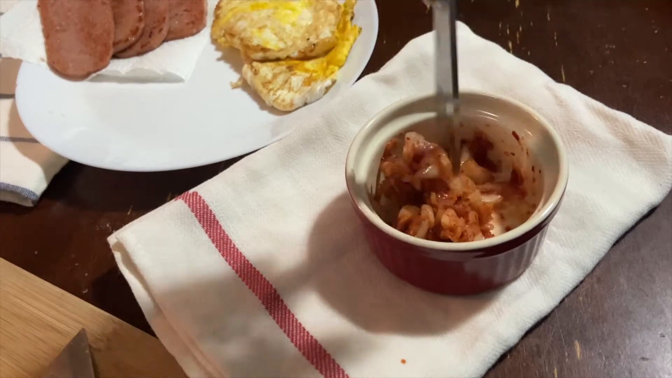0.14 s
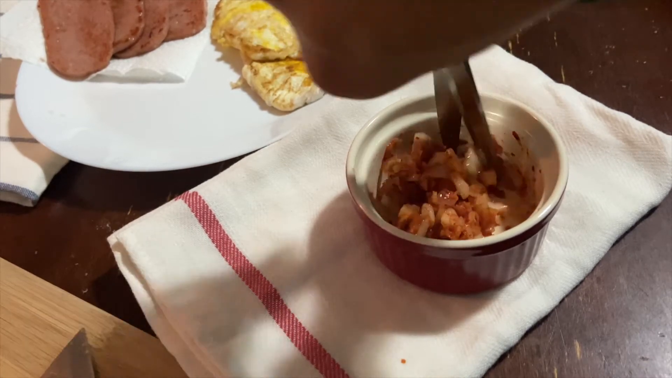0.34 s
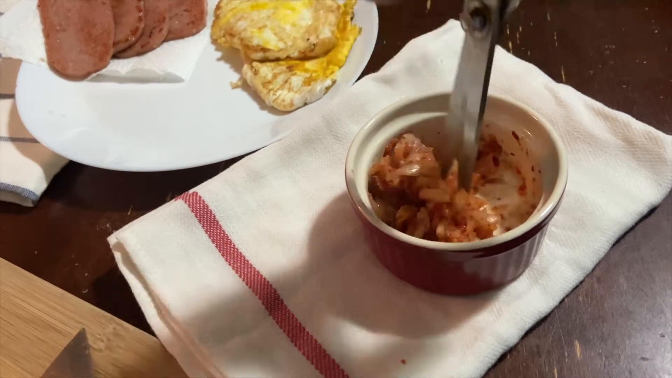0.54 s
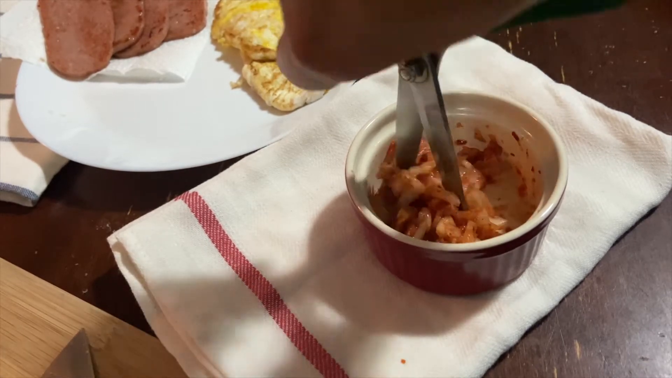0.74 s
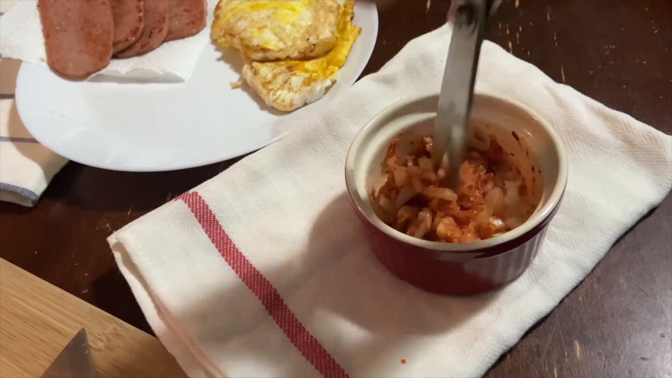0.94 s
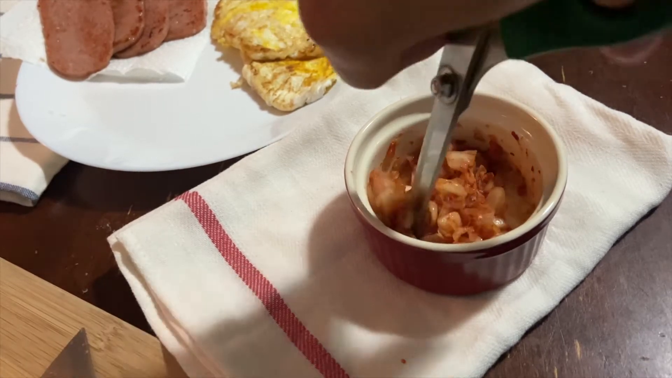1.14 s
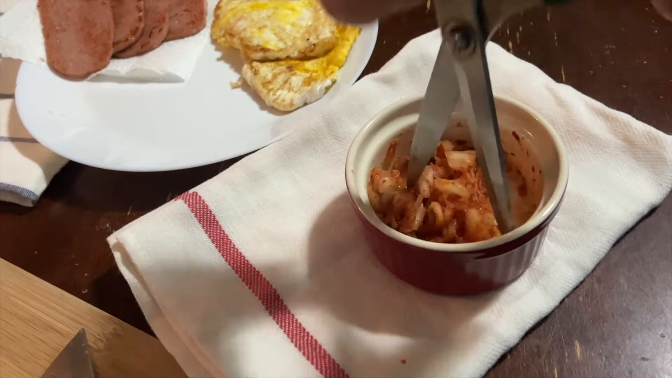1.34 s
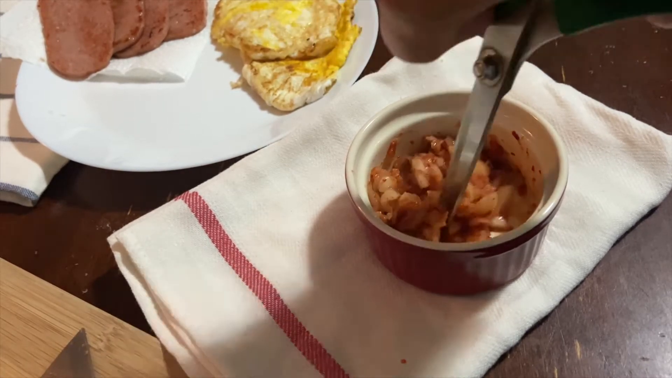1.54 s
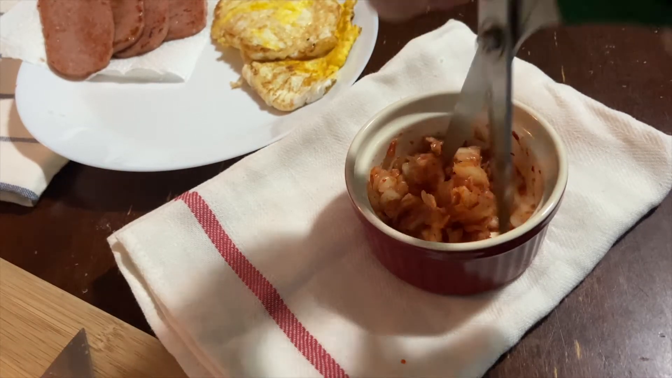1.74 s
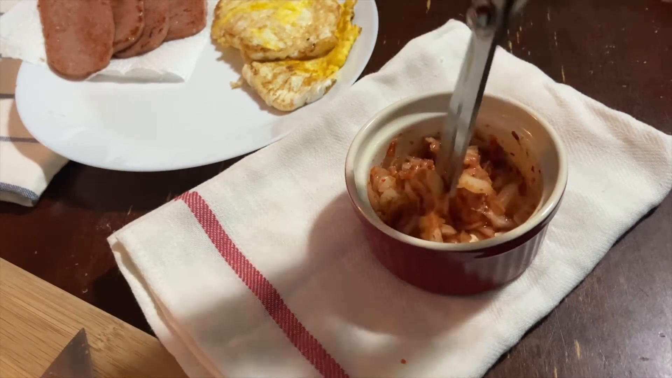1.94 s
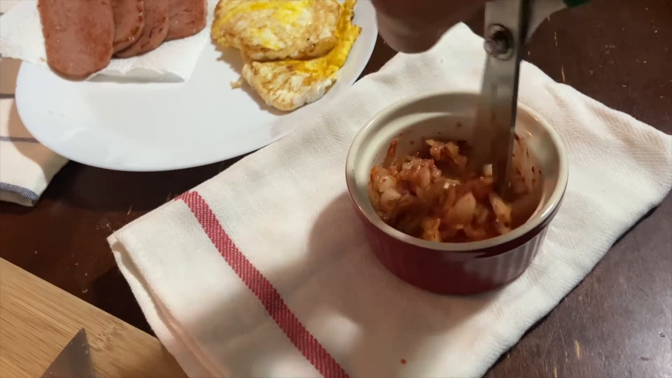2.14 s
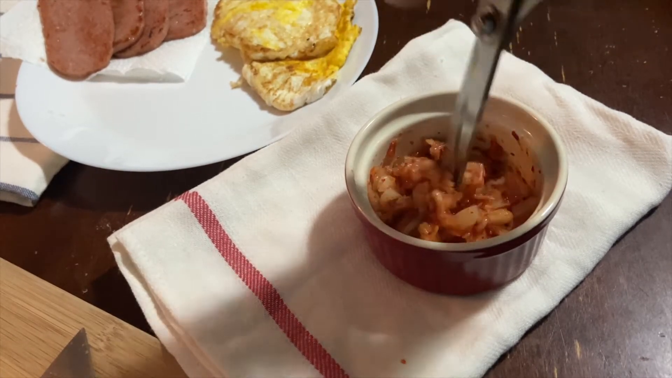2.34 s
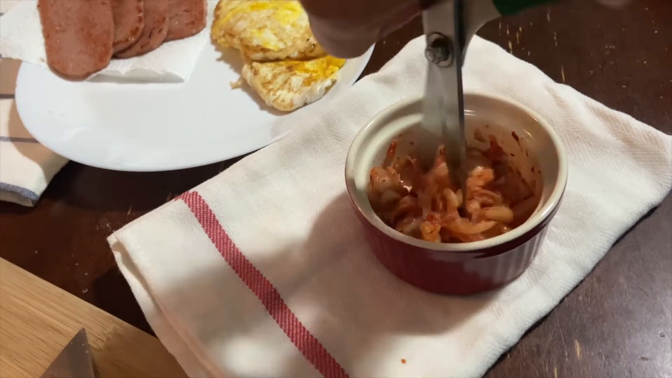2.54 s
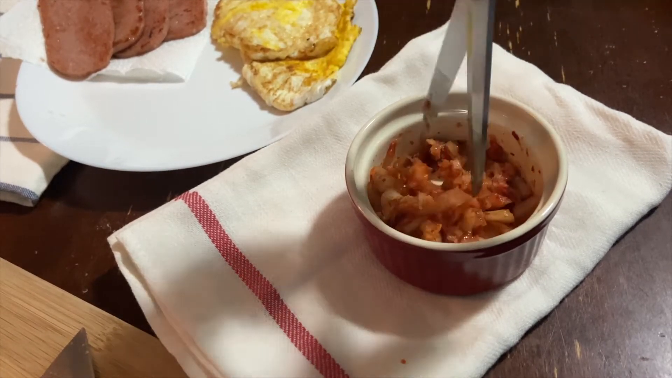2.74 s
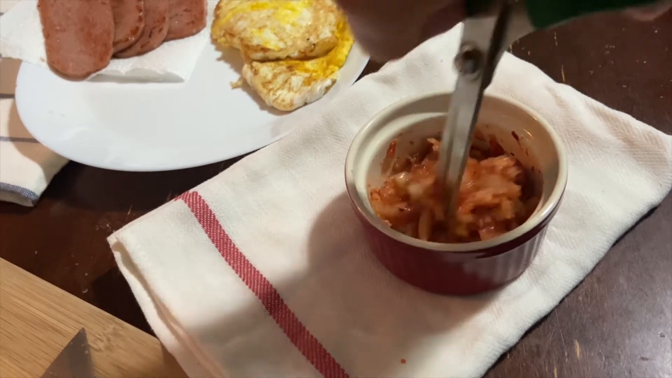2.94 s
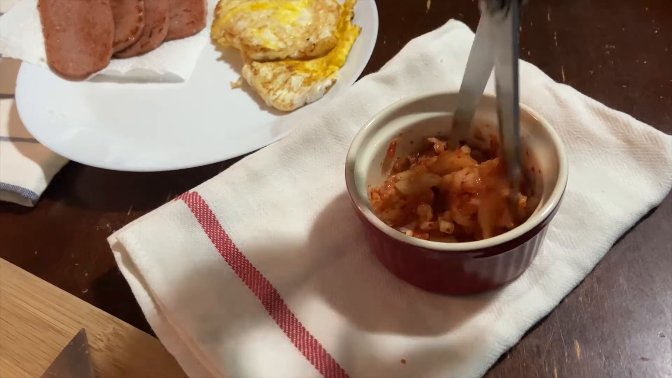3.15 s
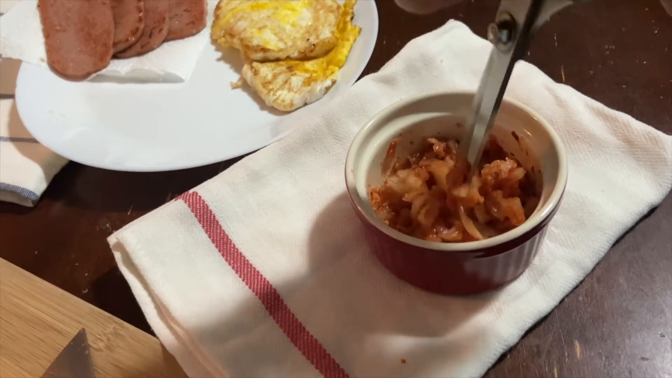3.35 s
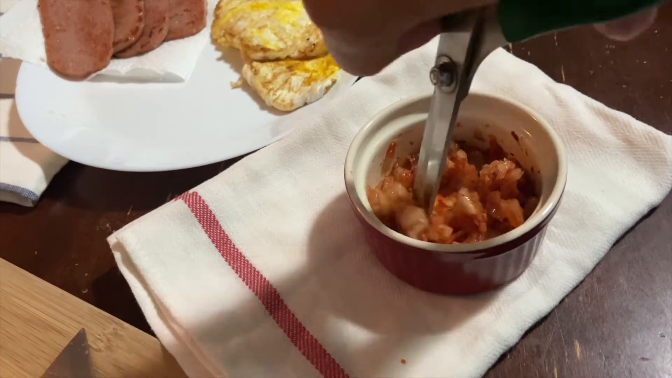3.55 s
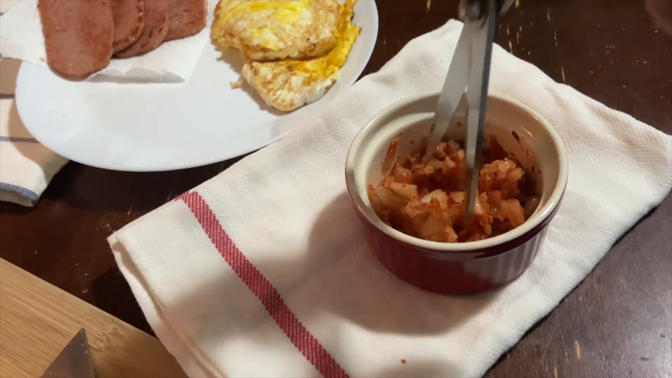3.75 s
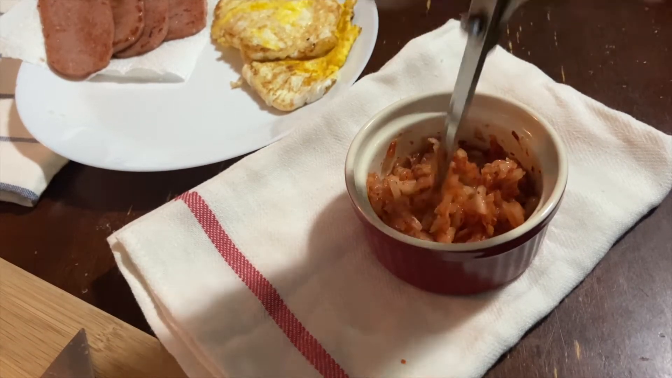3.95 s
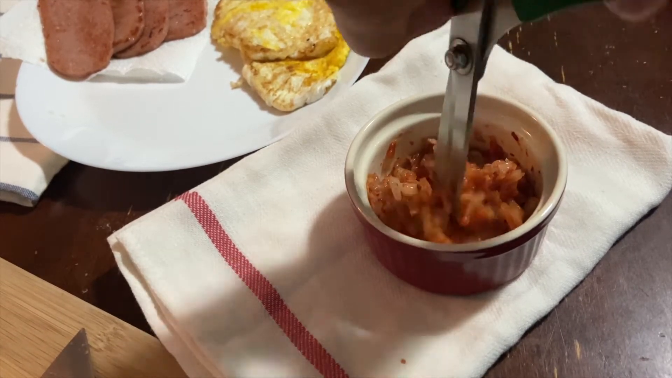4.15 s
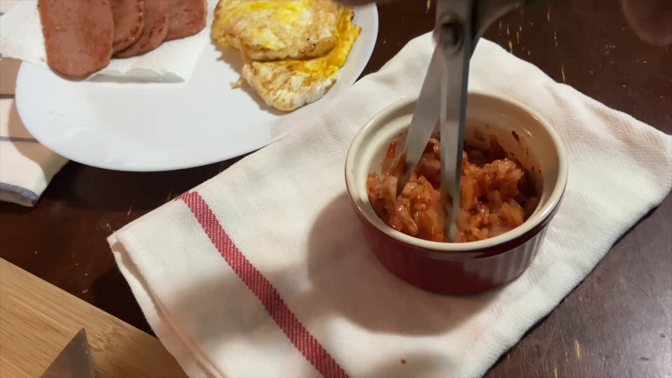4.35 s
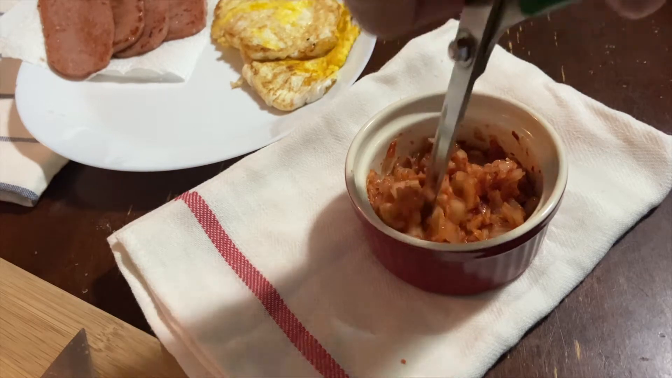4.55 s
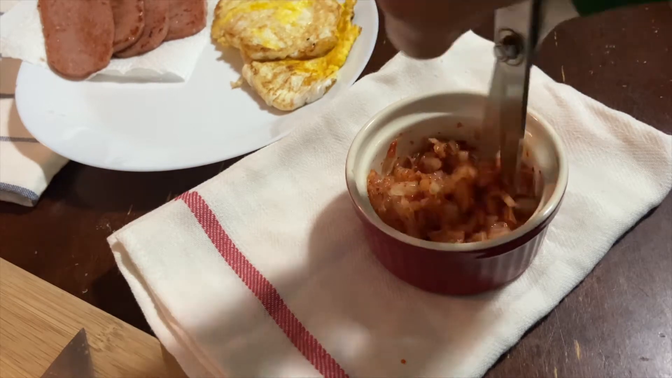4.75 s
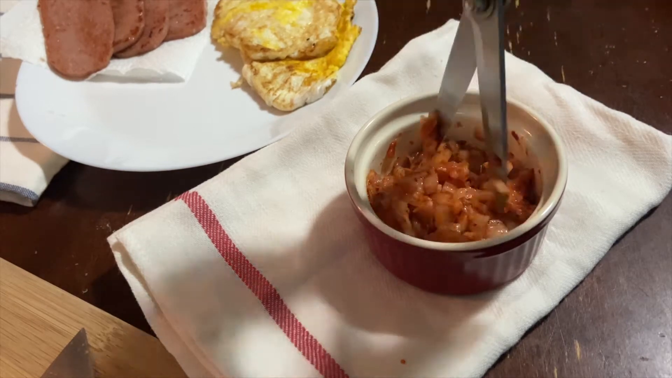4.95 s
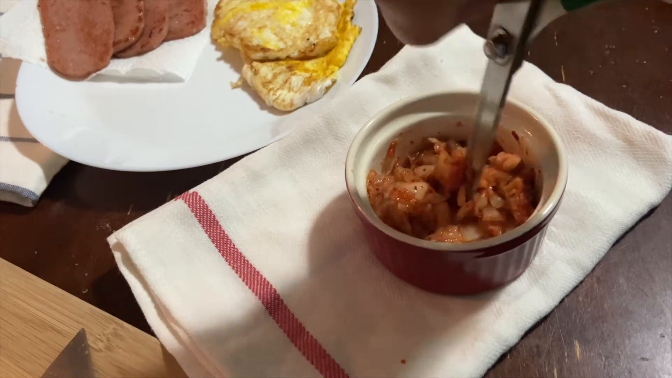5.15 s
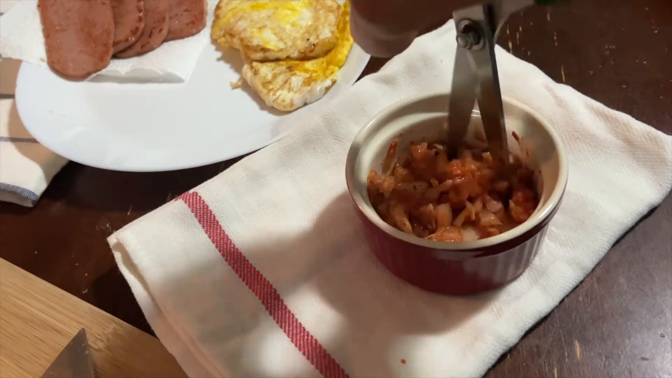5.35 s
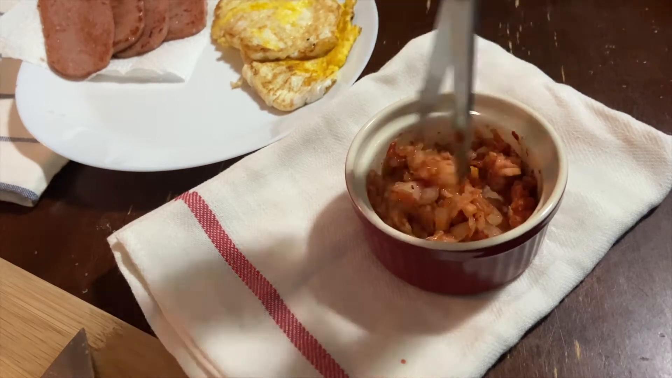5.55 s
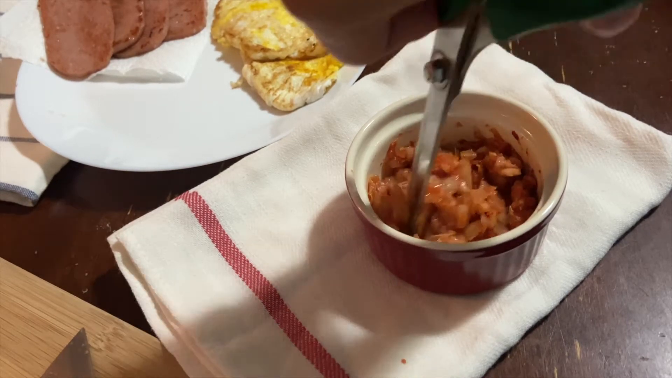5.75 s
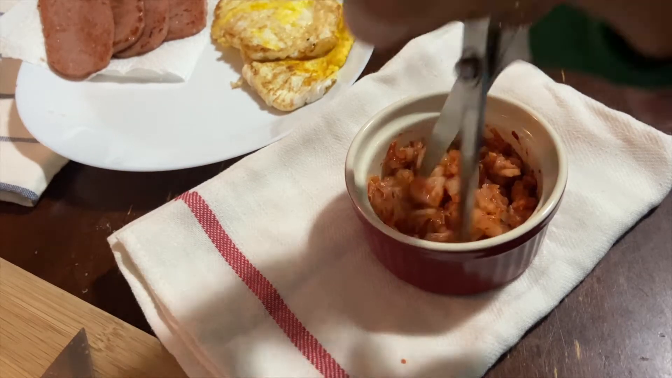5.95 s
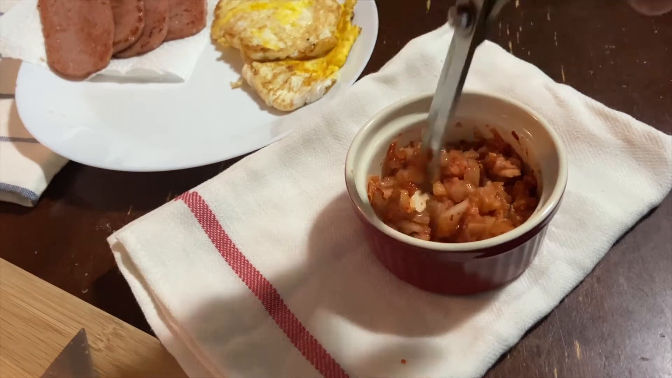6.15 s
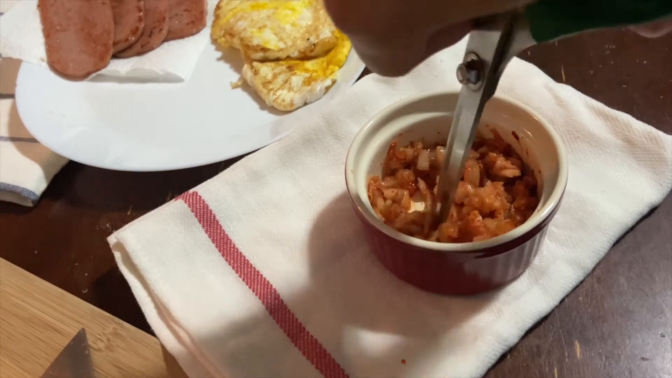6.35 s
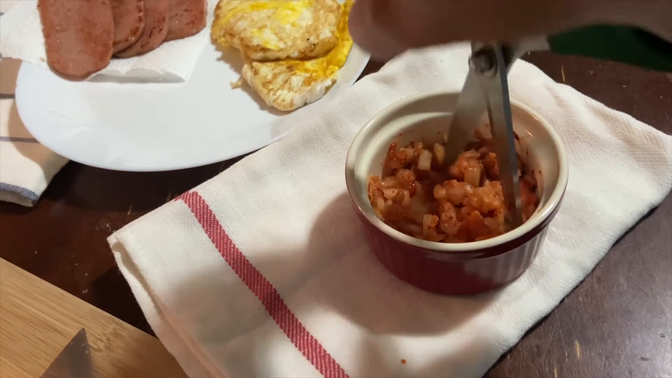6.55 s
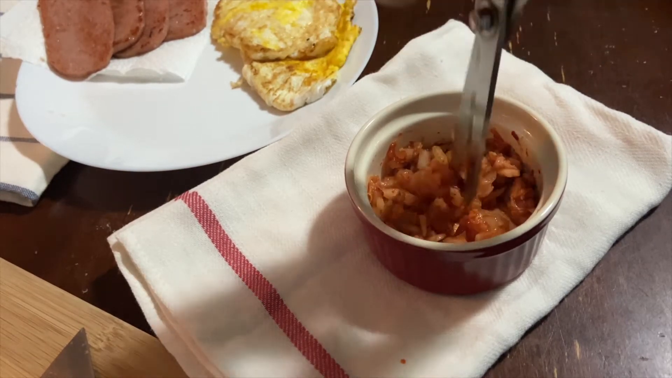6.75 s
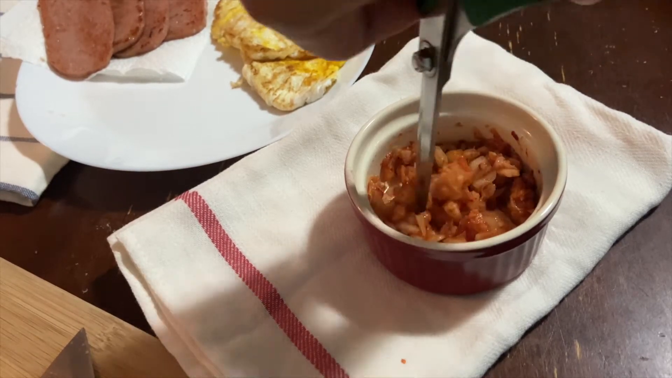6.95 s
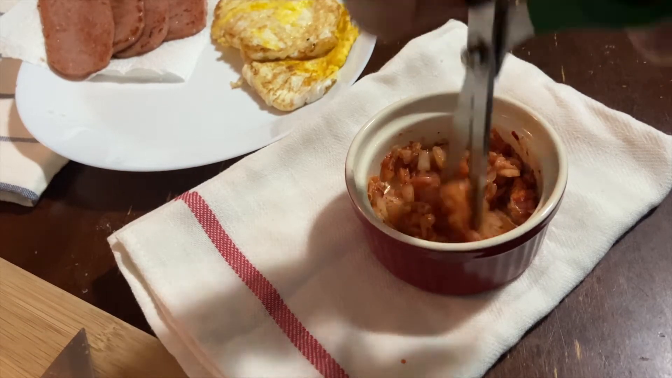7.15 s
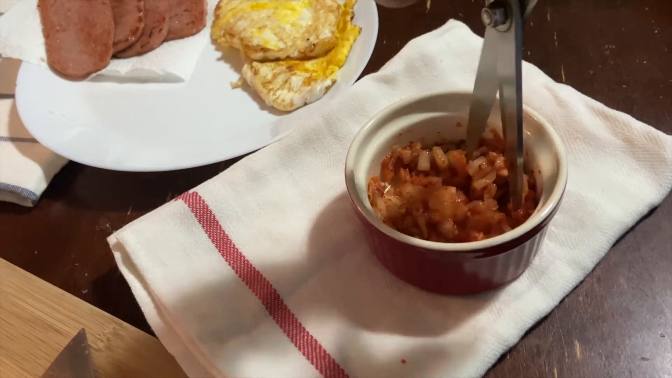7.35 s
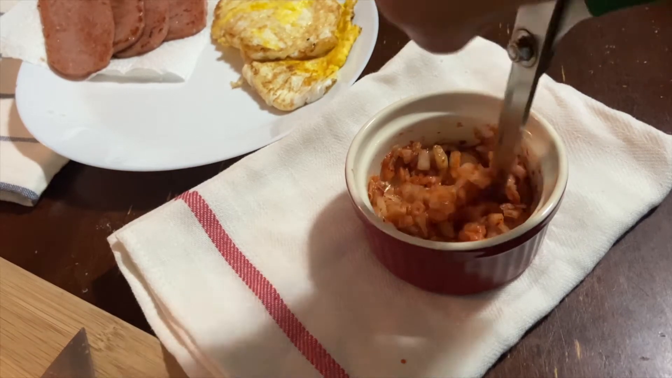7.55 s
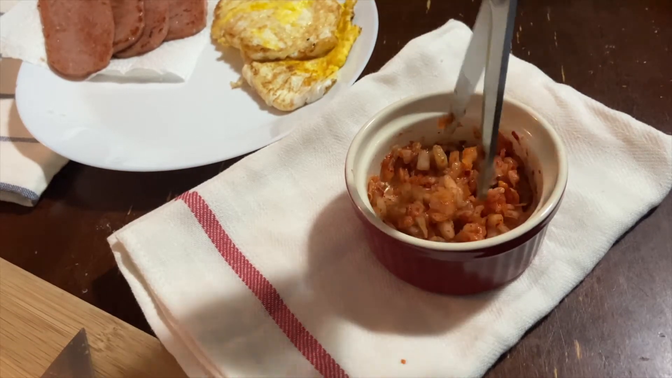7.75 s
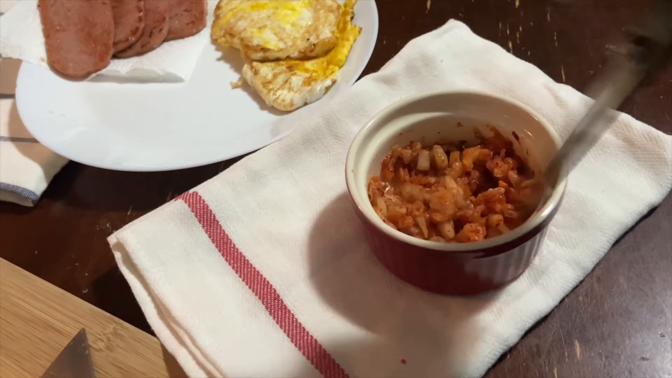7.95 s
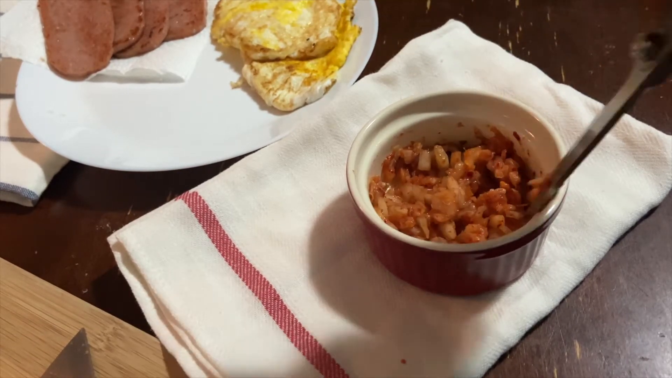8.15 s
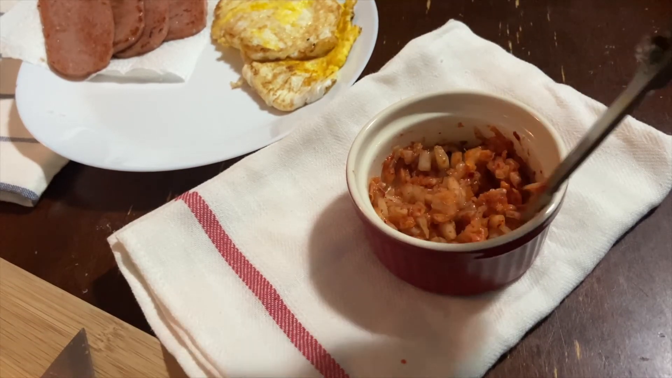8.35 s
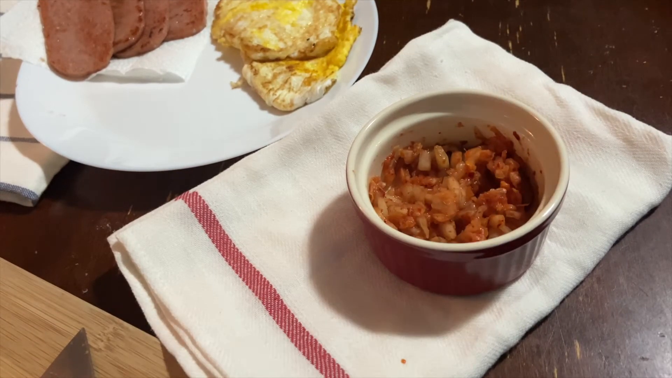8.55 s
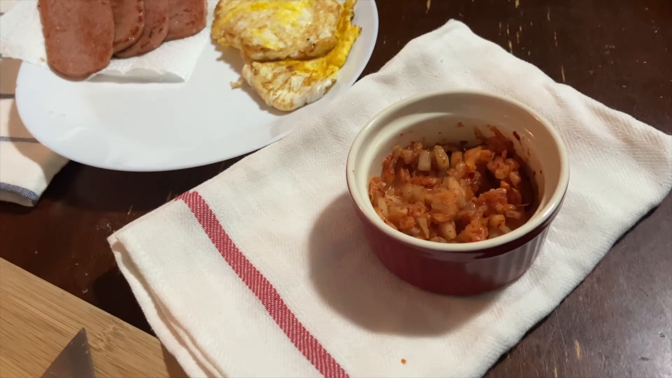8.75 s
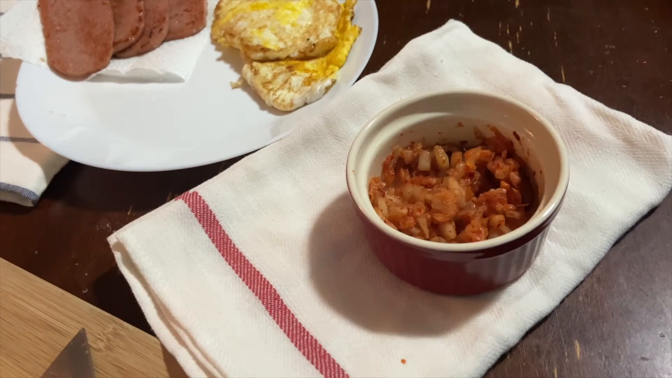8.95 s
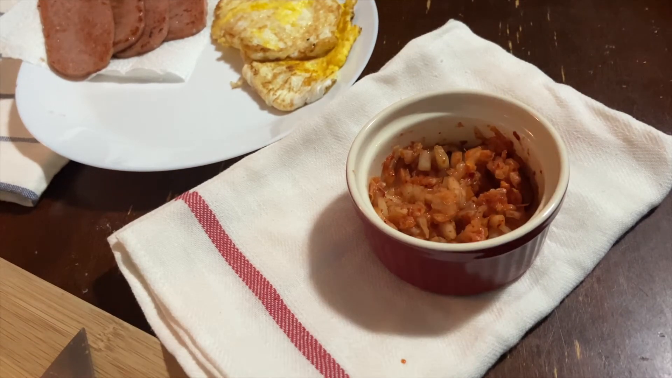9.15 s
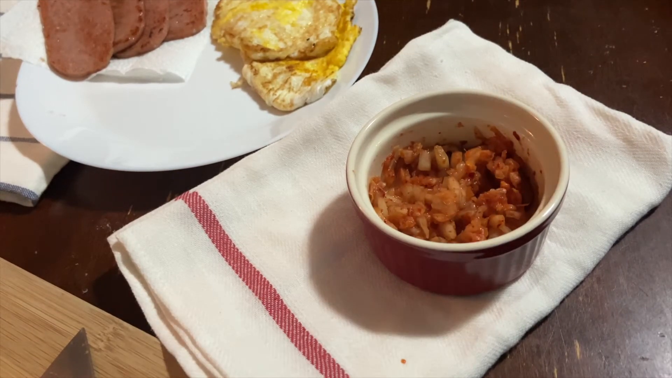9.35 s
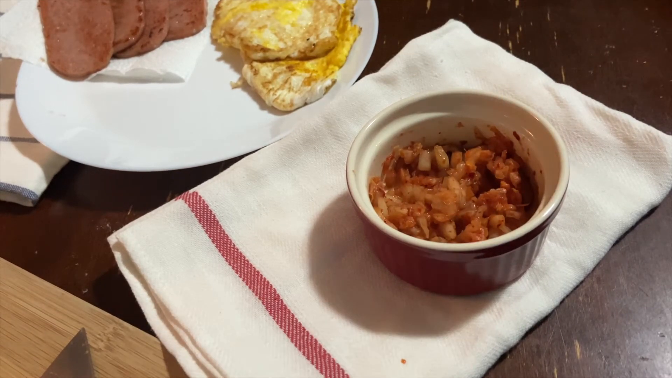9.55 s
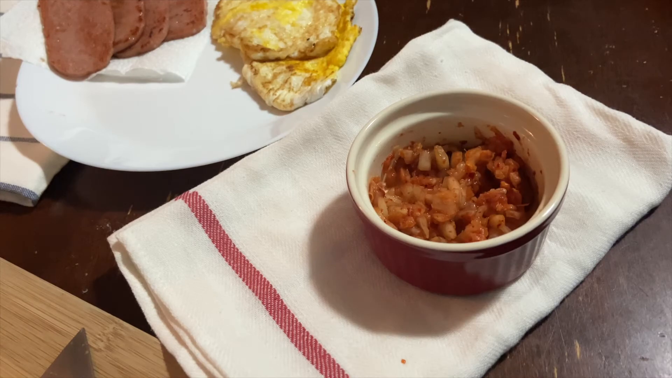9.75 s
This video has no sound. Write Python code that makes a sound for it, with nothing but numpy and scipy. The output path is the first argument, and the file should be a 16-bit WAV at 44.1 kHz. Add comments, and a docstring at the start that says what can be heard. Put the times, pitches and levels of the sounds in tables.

```python
"""Kitchen scissors snip wet food in a ceramic dish on a cloth-covered table, close to a two-port microphone.
Struck modes make the scissors' knocks and the dish's rings; noise bursts make the cracks of contact.
Resonated click trains make the blades' scrape and squelch, coloured clicks the juice; low modes thump the table.
The blades are tapped clean on the rim and laid down on wood. Shaped noise and wavering tones make a low
appliance rumble throughout, and decaying random taps return the near sounds from the kitchen walls."""
import sys
import numpy as np
from scipy import signal
from scipy.fft import rfft, irfft, next_fast_len
from scipy.io import wavfile
from scipy.ndimage import uniform_filter1d

SR = 44100
rng = np.random.default_rng(int(sys.argv[2]) if len(sys.argv) > 2 else 0)


def pcm_store(signal):
    """Save signal as 16-bit PCM."""
    levels = np.round(np.clip(np.atleast_2d(signal), -1, 1) * 32767)
    wavfile.write(sys.argv[1], SR, levels.astype(np.int16).T)


N = 436586  # length [samples]

# Appliance rumble spectrum: (frequency [Hz], relative level [dB])
RUMBLE_SPECTRUM = [(15, -79.5), (25, -57.5), (74, -46), (95, -5.5), (132, -12.5), (222, -9.5), (276, -8.5),
                   (353, -9.5), (561, -22), (1310, -31), (1770, -39.5), (8830, -50), (17000, -52)]
# Wavering appliance tones: (frequency [Hz], width of each resonator pass [Hz], level [dB])
HUM_TONES = [(104, 5.3, -65.5), (226, 63, -63.5), (1296, 29, -80)]
# Likeness of the rumble at the two ports: (frequency [Hz], correlation [0-1])
PORT_LIKENESS = [(60, 0.84), (240, 0.9), (950, 0.44), (3770, 0.6), (15000, 0.08)]
# Phase by which the left port leads on near sounds: (frequency [Hz], lead [rad])
PORT_LEAD = [(300, 0), (1200, .4), (3000, 1.), (6000, 1.5), (11000, 2.9), (12600, .8), (15000, .1)]
# Dying away of the kitchen's tail: (frequency [Hz], time to fall 60 dB [s])
KITCHEN_DECAY = [(200, 0.6), (1000, 0.091), (3000, 0.23), (7000, 0.14), (14000, .17)]
# Colour of what the walls return: (frequency [Hz], relative level [dB])
WALL_COLOUR = [(200, -1), (2500, 1), (6000, -2), (13000, -0.5)]

# Soft low modes of the table top: (frequency [Hz], relative level [dB], time to fall 60 dB [s])
TABLE_MODES = [(48, -21.5, 0.081), (77.5, -14.5, .2), (122, -2, 0.14), (160, -8, 0.17), (204.4, 1.5, 0.13),
               (242, -5.5, 0.1)]
# Woody modes of the table's boards: (frequency [Hz], relative level [dB], time to fall 60 dB [s])
BOARD_MODES = [(298.4, -2.5, 0.12), (371, -2.5, 0.08), (513, -9, 0.11), (747.6, -10, .03), (980, -6, 0.024)]
# Dish or scissors bump the table: (time [s], low thump level [dB], woody knock level [dB])
TABLE_BUMPS = [(0.014, -39, -40.5), (1.878, -48.5, -30.5), (3.159, -41, -37), (9.668, -49.5, -40.5),
               (9.682, -37.5, -40.5), (9.842, -40, -43)]
# Scissors touch down on a board: (time [s], level [dB])
TOUCHDOWNS = [(9.669, -50.5), (9.679, -21.5), (9.83, -26.5), (9.836, -25)]
# Modes of the scissors lying on wood: (frequency [Hz], relative level [dB], time to fall 60 dB [s])
LYING_MODES = [(1237, -11.5, 0.023), (1550, -8, 0.011), (1720, -11.5, .018), (1983, -8, 0.016),
               (2260, -10, 0.0077), (2580, -5, 0.011), (3000, -3, 0.0076), (3550, -6, 0.0055),
               (4020, 7.5, 0.0019), (5800, -13.5, 0.003)]
# A faint broad rustle: (middle time [s], Gaussian spread [s], level [dB])
FAINT_RUSTLE = (9.52, 0.031, -64.5)

# Modes of the held scissors: (frequency [Hz], relative level [dB], time to fall 60 dB [s])
SCISSORS_MODES = [(1310, -6.5, 0.0079), (2020, -1, 0.0051), (2410, -0.5, 0.0029), (3085, 0, 0.013),
                  (3360, -8, 0.019), (3835, 1, .005), (4558, -5, 0.0034)]
# Main dish ring, lower then upper twin, each followed by a damped neighbour:
# (frequency [Hz], relative level [dB], time to fall 60 dB [s])
DISH_TWINS = [(5482, 0, .024), (5300, -6, .012), (5553, -5, .09), (5500, -2, .02)]
# Dense high dish modes: (frequency [Hz], relative level [dB], time to fall 60 dB [s])
DISH_HIGH_MODES = [(6514, -10.5, 0.021), (8300, -19.5, 0.011), (9670, -14.5, .02), (10940, -9.5, 0.0046),
                   (12900, 0, 0.01), (12600, -6.5, .015), (13500, -3.5, 0.014), (13830, -6.5, .012),
                   (14210, -9, .02), (14600, -5, 0.0086), (15000, -14, .01)]
# Clearest high dish mode: (frequency [Hz], relative level [dB], time to fall 60 dB [s])
DISH_RIM_MODE = [(12885, -8, .04)]
# Crack of a contact away from the rim: (frequency [Hz], relative level [dB])
CRACK_COLOUR = [(500, -6.5), (1500, -17.5), (4000, 6), (8000, 4.5), (13000, 5), (16500, -11.5)]
# Thinner crack of a tap on the rim: (frequency [Hz], relative level [dB])
RIM_CRACK_COLOUR = [(500, -27.5), (2000, -16), (4000, -13), (6500, 5), (9000, 0.5), (13000, 3), (16500, 0)]
# A blade clips or taps the rim: (time [s], low ring level [dB], high ring level [dB])
TAPS_ON_RIM = [(1.072, -33, -24.5), (1.3357, -15.5, -20), (3.782, -22, -22.5), (4.361, -31.5, -24),
               (4.6719, -24, -31.5), (4.7096, -46, -21.5), (5.6432, -40, -32), (6.4687, -25.5, -22),
               (7.9588, -11.5, -12), (8.061, -10.5, -14.5), (8.1545, -10, -14.5), (8.2466, -13.5, -11),
               (8.334, -9, -12)]
# Blades catch or graze the dish in mid stroke: (time [s], scissors knock level [dB], low dish ring level [dB])
DISH_TICKS = [(0.0086, -36.5, -38), (0.4322, -35, -64), (1.4145, -35, -23), (1.772, -30.5, -53.5),
              (2.599, -39, -38), (3.171, -29, -34.5), (3.201, -35, -54), (3.2085, -22, -36),
              (3.512, -39.5, -58), (4.123, -27, -52), (4.2001, -27, -60), (4.2165, -35.5, -59),
              (4.7351, -26.5, -32), (5.0161, -43, -26.5), (5.0453, -24.5, -22), (5.113, -27, -57),
              (5.3487, -33, -37), (5.5823, -45, -35.5), (6.3143, -36.5, -53), (6.5731, -31.5, -47),
              (7.8121, -54, -52)]

# Body of the freely moving blades: (frequency [Hz], width of each resonator pass [Hz], relative level [dB])
FREE_BLADES = [(3250, 700, 0), (2650, 450, -8), (5530, 160, -2), (4300, 1000, -7), (2000, 600, -9)]
# Body of blades deep in the food: (frequency [Hz], width of each resonator pass [Hz], relative level [dB])
BURIED_BLADES = [(1260, 900, -9), (1930, 420, 0), (2730, 1200, -10)]
# Colour of the juice: (frequency [Hz], relative level [dB])
JUICE_COLOUR = [(1000, -6), (3000, -8.5), (7000, 0.5), (11000, -1.5), (15000, -8), (16300, -29)]
# Squelches apart from closing and parting: (start time [s], level [dB], length [s], juice against level [dB])
LOOSE_SQUELCHES = [(.283, -71, 0.019, 15.5), (.466, -57, 0.018, -23), (.808, -57, 0.0067, 1),
                   (1.8784, -42, 0.018, -1), (3.243, -36.5, 0.019, -22), (3.4377, -41.5, 0.027, -27),
                   (7.8044, -61.5, 0.0081, 13)]
# Snips, the tips landing in the dish before the blades close; about -90 dB is no landing:
# (landing time [s], scissors knock [dB], low dish ring [dB], high dish ring [dB], scrape [dB], juice [dB],
#  depth in the food [0-1], closing squelch [dB], closing thump [dB])
SNIP_EVENTS = [(0, -90, -38, -90, -56, -63.5, 0.5, -52.5, -58.5),
               (0.3161, -14.5, -5.5, -52, -57, -68.5, 1, -49, -40),
               (.7385, -22.5, -36, -44, -46.5, -61, 0.5, -38, -37.5),
               (1.0917, -17.5, -34, -40, -60, -55, 0, -45, -49),
               (1.3961, -23, -24, -38, -50.5, -66, 0.61, -43, -52),
               (1.764, -18.5, -19, -38, -51.5, -64, 0.37, -44, -55),
               (1.877, -90, -90, -90, -50, -45, 0, -66.5, -64),
               (2.104, -17.5, -17, -57, -59.5, -66, 0, -47.5, -46),
               (2.5059, -16.5, -17, -65, -48.5, -58.5, 0.48, -38.5, -36.5),
               (2.8683, -19.5, -12.5, -51.5, -46, -51.5, 0.12, -45.5, -47),
               (3.159, -92, -87.5, -86, -40, -50, 0.7, -34.5, -39),
               (3.442, -88, -89, -85, -45.5, -56, 0.99, -35, -39.5),
               (3.554, -90, -90, -90, -47, -68, 0.94, -68, -56),
               (3.8295, -21.5, -31, -29, -56, -57, .24, -71, -54),
               (4.1085, -21, -56, -60, -48.5, -52, 0.25, -48, -39),
               (4.4201, -22.5, -27.5, -34, -50.5, -56, 0.36, -55, -54),
               (4.7177, -14.5, -16, -28, -51.5, -52, 0, -48.5, -52),
               (5.0207, -20, -18.5, -48, -55, -59, 0.9, -40.5, -45.5),
               (5.3227, -17, -14, -69, -44.5, -61, 0.24, -49.5, -43.5),
               (5.652, -29, -23, -49, -47, -53.5, 0.1, -50, -40),
               (5.9574, -23, -23, -38, -47.5, -63, 0.25, -40.5, -40.5),
               (6.2597, -19, -26.5, -25, -49.5, -60.5, .4, -50, -52),
               (6.5602, -19, -22.5, -30.5, -50, -58.5, 0.42, -41.5, -40),
               (6.8841, -15, -35, -23.5, -43, -57.5, 0.62, -65, -48.5),
               (7.1611, -19.5, -29, -27, -52, -59, 0.93, -40, -42),
               (7.438, -18, -19.5, -60, -54, -58.5, 0.51, -41.5, -39.5)]
# Moment the blades meet in each snip: time [s]
MEET_TIMES = [.0556, .4337, .8407, 1.1515, 1.4983, 1.8499, 1.93, 2.2385, 2.6138, 2.9611, 3.2671, 3.5623,
              3.6334, 3.8722, 4.2017, 4.482, 4.8026, 5.1037, 5.411, 5.706, 6.0378, 6.3152, 6.6567, 6.95,
              7.2246, 7.5153]

RUMBLE_DB, KITCHEN_DB = -56.5, -7.0
EDGE_HZ = 16900  # upper band limit
CONTACT_S = 0.00044  # a contact takes a moment to build
KNOCK_CRACK_DB, TICK_CRACK_DB = -6, -5  # crack against the scissors knock
TAP_HARDNESS, TAP_CRACK_DB = 1.35, 9.5  # crack dB per dB of high ring, and offset: strong taps are sharper
TAP_KNOCK_DB, TICK_HIGH_DB = -37, -12  # dull knock under any tap; high ring of a tick against its low ring
CUT_DELAY_S, MEET_S = .002, .003  # cutting starts after the landing, stops just after the blades meet
SQUELCH_S, SHALLOW_DB, MUFFLE_DB = 0.01, 9.5, -19.5  # closing squelch: length, juice share, change at depth 1
REOPEN_S, REOPEN_LENGTH_S, REOPEN_DB = .087, 0.023, -71  # the blades pull apart with a faint suck
LANDING_PUSH_DB, TAP_PUSH_DB = -22, -34.5  # table thump against scissors knock, and against low tap ring
WOODY_DB = -5  # boards against table
LANDING_PUSH_S, CLOSING_PUSH_S = .004, .002  # the table lags the blow


def gain_of(db):
    """Decibels to gain."""
    return 10 ** (np.asarray(db) / 20)


def evened(x):
    """Scales to rms 1."""
    return x / np.sqrt(np.mean(x ** 2) + 1e-20)


def read(points, hz):
    """Reads a spectrum table on a log-frequency axis."""
    f, value = np.transpose(points)
    return np.interp(np.log(hz + 1), np.log(f + 1), value)


def colour(x, gain):
    """Filters x by a function of frequency."""
    size = next_fast_len(x.shape[-1])
    spectrum = rfft(x, size) * gain(np.fft.rfftfreq(size, 1 / SR))
    return irfft(spectrum, size)[..., :x.shape[-1]]


def resonate(x, hz, width):
    """Shifts hz down to zero, smooths, and shifts back: a resonance of gain 1."""
    turn = np.exp(2j * np.pi * hz * np.arange(len(x)) / SR)
    r = np.exp(-np.pi * width / SR)
    return 2 * (turn * signal.lfilter([1 - r], [1, -r], x / turn)).real


def resonate_twice(x, hz, width):
    """Two equal resonances in a row give steeper skirts."""
    return resonate(resonate(x, hz, width), hz, width)


def grains(per_s, spread_db):
    """A random train of clicks of either sign, most small and a few large."""
    size = gain_of(spread_db * np.minimum(rng.exponential(1, N), 5))
    present = rng.random(N) < per_s / SR
    return size * present * rng.choice([-1, 1], N)


def strike(times, db, modes, spread_db, rise_s, wide):
    """Rings decaying modes; every blow gives each mode its own level, sign and phase between the ports."""
    hz, mode_db, t60 = np.transpose(modes)[:, :, None]
    luck = rng.standard_normal((len(times), 3, len(modes), 1))
    t = np.arange(SR // 5) / SR
    out = np.zeros((2, N + SR))
    dying = gain_of(mode_db - 60 * t / t60) * (1 - np.exp(-t / rise_s))
    for s, level_db, (share, sign, side) in zip(times, db, luck):
        at = round(s * SR)
        size = np.sign(sign) * gain_of(level_db + spread_db * share)
        for port, lean in enumerate((wide * side, -wide * side)):
            rings = size * np.sin(2 * np.pi * hz * t + lean) * dying
            out[port, at:at + len(t)] += rings.sum(0)
    return out[:, :N]


def rumble():
    """Appliance rumble: random short-time spectra with slight drifting patches, and narrow noise tones."""
    frames, hz = N // 512 + 5, np.fft.rfftfreq(2048, 1 / SR)
    a, b, c, d, patches = rng.standard_normal((frames, 1025, 5)).T
    patches = evened(uniform_filter1d(uniform_filter1d(patches, 12, 0), 10, 1))
    same = np.clip(read(PORT_LIKENESS, hz), -1, 1)[:, None]
    left = a + 1j * b
    right = same * left + np.sqrt(1 - same ** 2) * (c + 1j * d)
    spectra = np.array([left, right]) * gain_of(read(RUMBLE_SPECTRUM, hz)[:, None] + 1.6 * patches)
    wash = signal.istft(spectra, nperseg=2048, noverlap=1536)[1][:, :N]
    noise = rng.standard_normal(N)
    hum = sum(gain_of(db) * evened(resonate_twice(noise, f, w)) for f, w, db in HUM_TONES)
    return gain_of(RUMBLE_DB) * evened(wash) + hum


def kitchen(x):
    """Wall reflections: sparse taps of random sign, one in every 20 samples, each band dying at its own speed."""
    taps = np.zeros((2, SR // 2))
    starts = np.arange(100, SR // 2 - 20, 20)
    at = starts + rng.integers(0, 20, (2, len(starts)))
    np.put_along_axis(taps, at, rng.choice([-1., 1.], at.shape), 1)
    taps[1] = 0.42 * taps[0] + 0.49 * taps[1]  # the ports share part of the tail
    hz, t, z = signal.stft(taps, SR, nperseg=128)
    tail_db = read(WALL_COLOUR, hz)[:, None] - 60 * t / read(KITCHEN_DECAY, hz)[:, None]
    tail = signal.istft(z * gain_of(tail_db), SR, nperseg=128)[1]
    return signal.fftconvolve(x[None], tail / np.linalg.norm(tail[0]), axes=1)[:, :N]


def thumps():
    """The table under the cloth answers each push with a soft low ring and a woody knock."""
    snip, tap, bump = np.transpose(SNIP_EVENTS), np.transpose(TAPS_ON_RIM), np.transpose(TABLE_BUMPS)
    s = np.hstack([snip[0] + LANDING_PUSH_S, np.add(MEET_TIMES, CLOSING_PUSH_S), tap[0], bump[0]])
    pushes_db = np.hstack([snip[1] + LANDING_PUSH_DB, snip[-1], tap[1] + TAP_PUSH_DB])
    low_db = np.hstack([pushes_db, bump[1]])
    woody_db = np.hstack([pushes_db + WOODY_DB, bump[2]])
    table = strike(s, low_db, TABLE_MODES, 1.2, .003, .08)
    return table + strike(s, woody_db, BOARD_MODES, 2.5, .002, .6)


def laid_down():
    """The scissors clatter down on wood, their short modes spread in phase between the ports."""
    s, db = np.transpose(TOUCHDOWNS)
    return strike(s, db, LYING_MODES, 3, 0.0004, 0.66)


def contacts():
    """All hard contacts as columns: time [s], then crack, knock, low ring and high ring [dB]."""
    s, knock, low, high = np.transpose(SNIP_EVENTS)[:4]
    snips = [s, knock + KNOCK_CRACK_DB, knock, low, high]
    s, low, high = np.transpose(TAPS_ON_RIM)
    taps = [s, TAP_HARDNESS * high + TAP_CRACK_DB, np.full_like(s, TAP_KNOCK_DB), low, high]
    s, knock, low = np.transpose(DISH_TICKS)
    ticks = [s, knock + TICK_CRACK_DB, knock, low, low + TICK_HIGH_DB]
    return np.hstack([snips, taps, ticks])


def cracks(s, crack_db, spectrum):
    """Coloured noise bursts that die with a time constant of 0.6 ms."""
    t = np.arange(220) / SR
    bursts = rng.standard_normal((len(s), len(t))) * np.exp(-t / .0006) * gain_of(crack_db)[:, None]
    crack = np.zeros(N + len(t))
    at = np.round(s * SR).astype(int)[:, None] + np.arange(len(t))
    np.add.at(crack, at, bursts)
    return colour(crack[:N], lambda hz: gain_of(read(spectrum, hz)))


def blows():
    """Steel meets steel and glaze: a very short noise crack, then decaying scissors and dish modes."""
    s, crack_db, knock_db, low_db, high_db = contacts()
    on_rim = np.isin(s, np.transpose(TAPS_ON_RIM)[0])
    s = s + CONTACT_S
    crack = cracks(s[on_rim], crack_db[on_rim], RIM_CRACK_COLOUR)
    crack += cracks(s[~on_rim], crack_db[~on_rim], CRACK_COLOUR)
    # the main dish mode is split in two: blows near the rim wake the high modes and the lower twin
    rim = 1 / (1 + gain_of(2 * (low_db - high_db - 10)))  # energy share of the lower twin
    dish = strike(s, low_db + 10 * np.log10(rim), DISH_TWINS[:2], 1.0, 0.00027, 0.09)
    dish += strike(s, low_db + 10 * np.log10(1 - rim + 1e-4), DISH_TWINS[2:], 0.22, 0.0001, 0.45)
    dish += strike(s, high_db, DISH_RIM_MODE, 0.4, 0.00027, .25)
    dish += strike(s, high_db, DISH_HIGH_MODES, 2.5, 0.0002, 1.0)
    return crack + dish + strike(s, knock_db, SCISSORS_MODES, 0.85, .0001, 0.45)


def squelches():
    """All squelches as rows: one where the blades meet, one where they part, and the loose ones."""
    rows = list(LOOSE_SQUELCHES)
    for meet, (*_, depth, db, _) in zip(MEET_TIMES, SNIP_EVENTS):
        rows.append((meet - SQUELCH_S / 2, db, SQUELCH_S, SHALLOW_DB + MUFFLE_DB * depth))
        rows.append((meet + REOPEN_S - REOPEN_LENGTH_S / 2, REOPEN_DB, REOPEN_LENGTH_S, 0))
    return rows


def stroke_levels():
    """Gain over time of the free blades, the buried blades and the juice."""
    t = np.arange(N) / SR
    free, deep, wet = np.zeros((3, N))
    for meet, (landing, *_, scrape_db, wet_db, depth, _, _) in zip(MEET_TIMES, SNIP_EVENTS):
        start, end = landing + CUT_DELAY_S, meet + MEET_S
        part = slice(round(start * SR), round((end + 0.42) * SR))
        since, after = t[part] - start, np.maximum(t[part] - end, 0)
        rise = 1 - np.exp(-since / 0.0015)
        scrape = rise * gain_of(scrape_db - 60 * since - 1200 * after)  # the load eases as the cut goes on
        buried = np.clip(depth, 0, 1)
        free[part] += scrape * (1 - buried)
        deep[part] += scrape * buried
        wet[part] += rise * gain_of(wet_db - 2.9 * np.minimum(after / .006, 1) - 300 * after)  # juice settles
    for start, db, length, bright_db in squelches():
        part = slice(round(start * SR), round((start + length) * SR))
        bump = gain_of(db) * np.sin(np.pi * np.clip((t[part] - start) / length, 0, 1)) ** 2
        wet[part] += gain_of(bright_db) * bump
        free[part] += 0.97 * bump
        deep[part] += 1.1 * bump
    middle, spread, rustle_db = FAINT_RUSTLE
    wet += gain_of(rustle_db) * np.exp(-.5 * ((t - middle) / spread) ** 2)
    return free, deep, wet


def blade_body(slips, body):
    """Slips of the blades heard through a set of broad resonances, at rms 1."""
    return evened(sum(gain_of(db) * resonate_twice(slips, f, w) for f, w, db in body))


def juice():
    """Bursting fibres and juice: coloured random clicks, partly shared by the two ports."""
    shared, left, right = (colour(grains(6300, 4.5), lambda hz: gain_of(read(JUICE_COLOUR, hz)))
                           for _ in range(3))
    return evened(shared + 1.2 * np.array([left, right]))


def strokes():
    """Uneven slips of the blades sound through the scissors; bursting fibres and juice fizz above."""
    free, deep, wet = stroke_levels()
    clumps = evened(uniform_filter1d(uniform_filter1d(rng.standard_normal(N), 200), 200))
    slips = grains(3500, 2.5) * gain_of(5. * clumps)
    scrape = free * blade_body(slips, FREE_BLADES) + deep * blade_body(slips, BURIED_BLADES)
    return scrape + wet * juice()


def scene():
    """Near sounds differ in phase between the ports, the left mostly ahead; walls add a tail."""
    near = blows() + strokes() + thumps() + laid_down()
    # half the lead is given to the left port and half taken from the right
    ports = colour(near, lambda hz: np.exp(1j * np.outer([.5, -.5], read(PORT_LEAD, hz))))
    return ports + gain_of(KITCHEN_DB) * kitchen(near.mean(0)) + rumble()


def record(dry):
    """The microphone drops the deep bass and the top treble; then a steep band limit."""
    cut = signal.sosfilt(signal.butter(2, 70, "highpass", fs=SR, output="sos"), dry)
    cut = signal.sosfilt(signal.butter(6, 15700, "lowpass", fs=SR, output="sos"), cut)
    band_limit = signal.firwin(511, EDGE_HZ, window=("kaiser", 9), fs=SR)
    return signal.oaconvolve(cut, band_limit[None], "same")


dry = scene()
out = record(dry)
pcm_store(out)
```